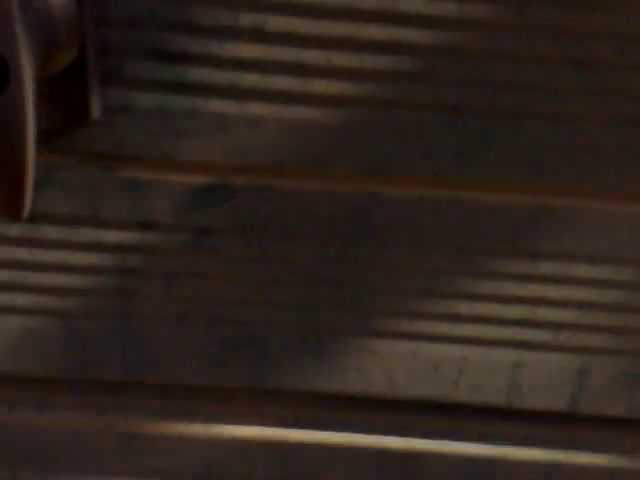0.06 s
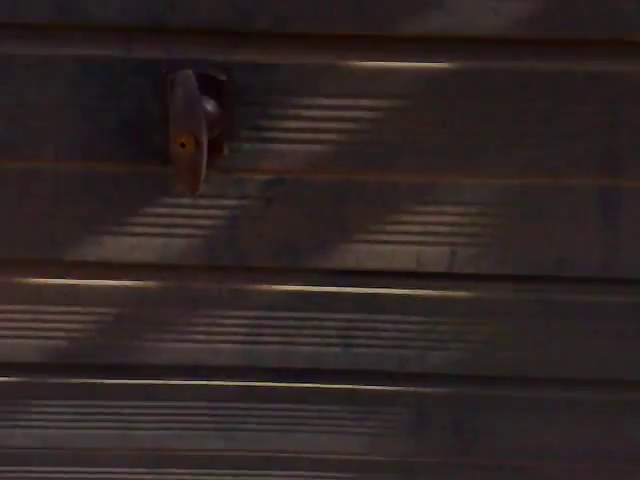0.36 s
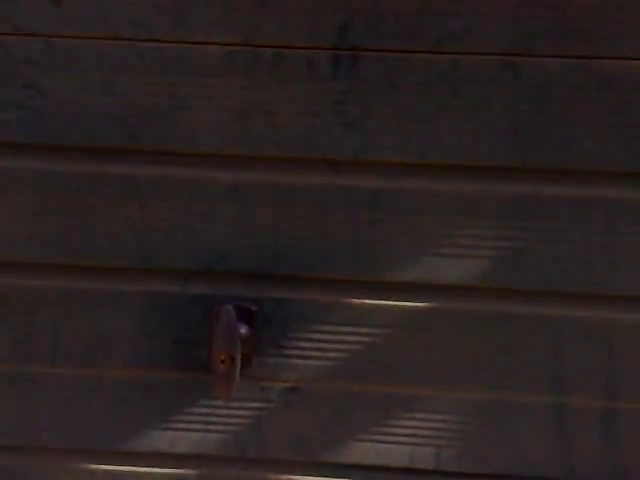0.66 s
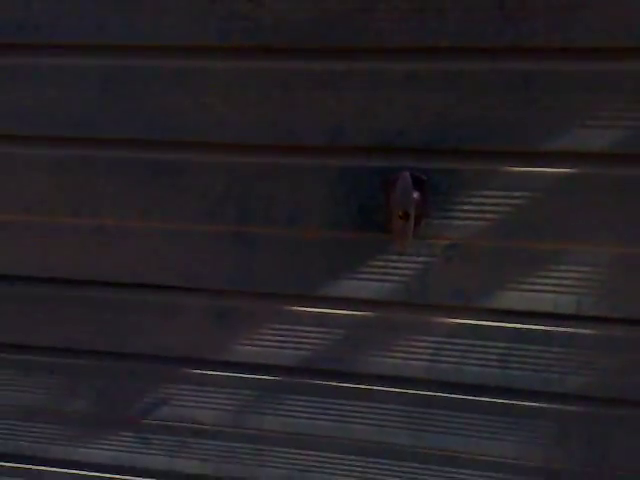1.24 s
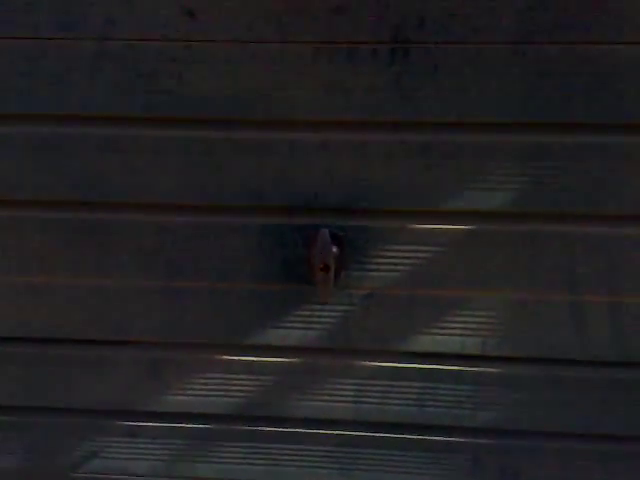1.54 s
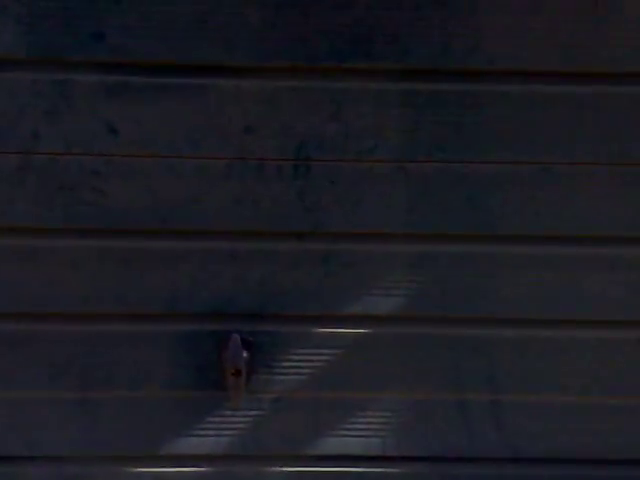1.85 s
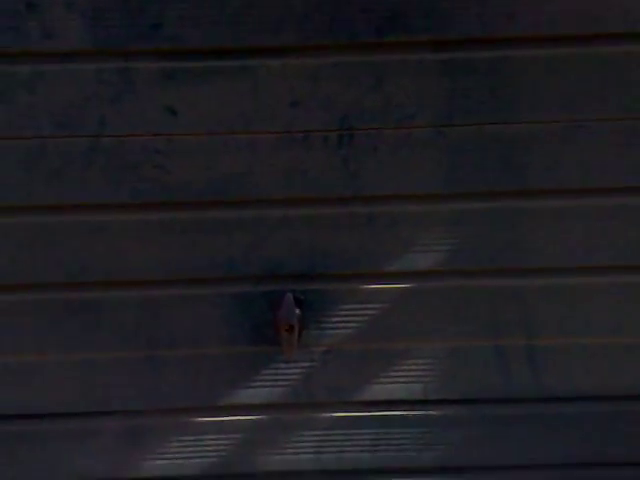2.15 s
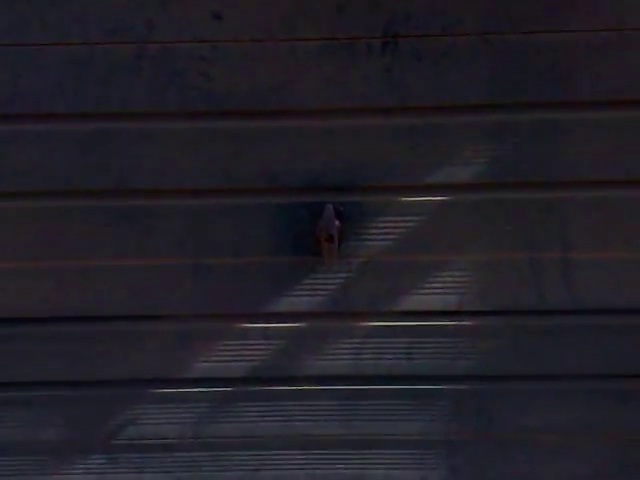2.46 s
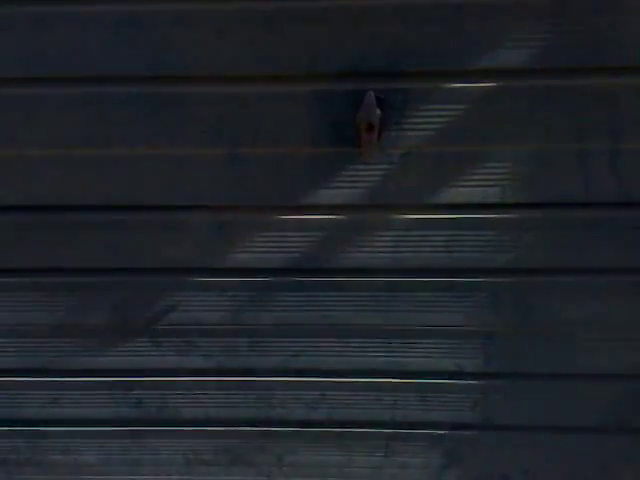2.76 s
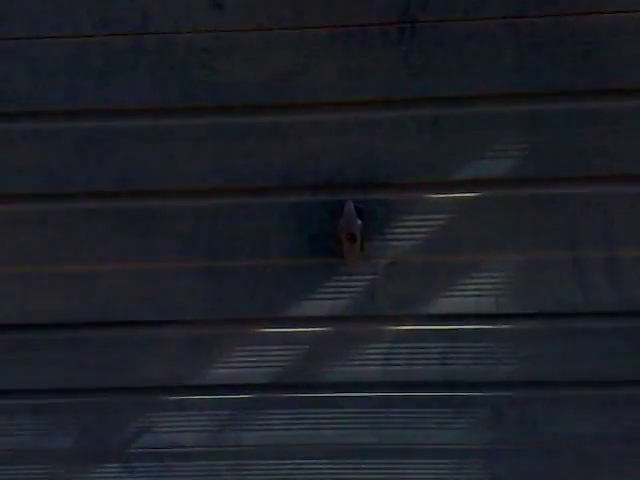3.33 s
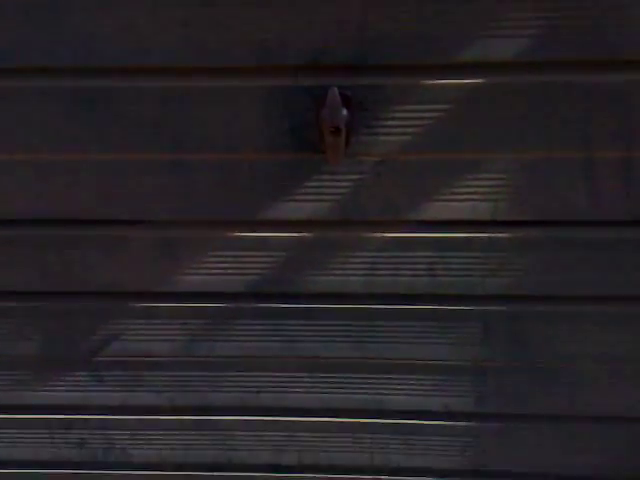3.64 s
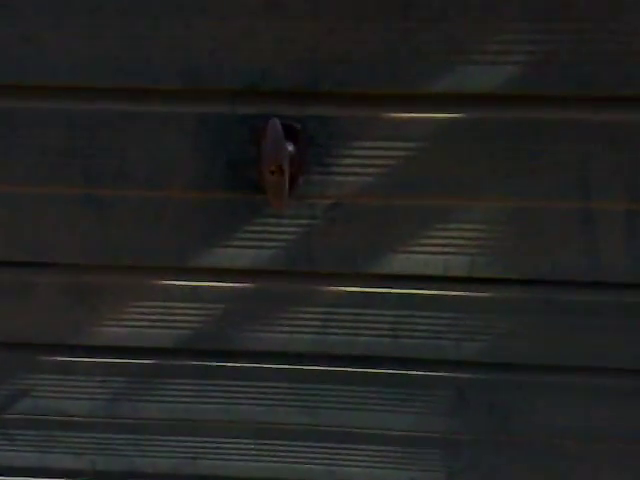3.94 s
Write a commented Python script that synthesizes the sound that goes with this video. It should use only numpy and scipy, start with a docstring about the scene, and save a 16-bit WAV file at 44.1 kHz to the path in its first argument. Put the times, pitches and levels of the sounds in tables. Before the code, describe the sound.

Loud, booming clatter of a steel garage door, settling into quiet street traffic.

```python
"""Inside a garage, microphone close to a sectional steel door. A thin high peep, then the door bangs and
overloads the input: its panels boom and ring, its hinges and rollers clatter, then tick as they settle. After
the bang the steady traffic outside is heard much lower and returns over the next two seconds, while a vehicle
passes, its engine drone sinking in pitch. Near the end come a second, fainter engine note and a few more peeps."""
import sys
import numpy as np
from scipy import signal
from scipy.fft import rfft, irfft
from scipy.io import wavfile

SR = 44100
rng = np.random.default_rng(int(sys.argv[2]) if len(sys.argv) > 2 else 0)


def waveform_to_disk(signal):
    """Save audio, clipped to [-1, 1], as 16-bit WAV at the path in sys.argv[1]."""
    frames = np.transpose(np.atleast_2d(signal))
    scaled = np.clip(frames, -1, 1) * 32767
    samples = np.round(scaled).astype(np.int16)
    wavfile.write(sys.argv[1], SR, samples)


N = 176400

# Blows of the door sections, close up. Each row: start in seconds, panel and clash level in relative dB.
DOOR_BLOWS = [(.062, 1.5, -0.5), (0.067, -7.5, 3), (0.081, 3, -5), (0.13, -3, -2), (.169, -16, -1.5),
              (0.19, -13, -11), (.240, -7.5, -11), (.262, -16, -16), (.290, -14, -13), (.335, -11, -18),
              (0.368, -19, -26), (.427, -14, -22), (.450, -28, -20), (0.475, -24.5, -19), (.488, -32, -34)]
# Decay of the panels. Each row: frequency in Hz, seconds to fall 60 dB.
PANEL_DECAY = [(60, 1.14), (250, 1.39), (700, 1.29), (1600, 0.97), (4000, 0.85), (8000, 0.44), (15000, .5)]
# Strongest panel modes. Each row: frequency in Hz, level in relative dB, seconds to fall 60 dB.
DOOR_MODES = [(78.2, 1.5, 0.47), (117.9, -8.5, 1.64), (151.9, -6.5, 0.65), (224.4, -16.5, 1.1),
              (291, -10.5, 0.47), (441.4, -12, 1.2), (1290, -11.5, 1.3), (1330, -14, 1.1), (1415, -21, 1.2),
              (1587, -11, 1), (1867, -22.5, 1.2), (2090, -12.5, .6), (2332, -11.5, 0.65), (2710, -12, .6)]
# The hardware settling. Each row: start in seconds, body and bright edge level in relative dB.
SETTLING_TICKS = [(.574, -48, -54), (.634, -43, -59), (.708, -43, -76), (.759, -53, -70), (.793, -38, -69),
                  (0.81, -50, -68), (.823, -53, -65), (.885, -47, -78), (.953, -42, -69.5),
                  (.968, -41, -54.5), (1.018, -42, -61), (1.130, -40.5, -72), (1.357, -45, -61),
                  (1.378, -42, -54), (1.429, -39, -65), (2.049, -39, -62), (3.625, -48, -58)]
# Spectra of the door's steel. Each row: frequency in Hz, density in relative dB.
PANEL_COLOUR = [(25, -7), (45, -9.5), (80, -6), (125, -5), (200, -5.5), (300, -9), (430, -12.5), (510, -17),
                (810, -11.5), (1150, -12), (1500, -9), (2200, -14), (3000, -21.5), (4900, -26), (7900, -41),
                (12000, -44), (16500, -45.5)]
CLASH_COLOUR = [(200, -18), (900, -7), (1900, 2.5), (3000, -7), (4200, 0.5), (6500, -12), (9000, -26),
                (16500, -40)]
CLASH_TOP_COLOUR = [(4000, -17), (7000, -1), (9500, 0.5), (13500, 3.5), (15500, -8), (16800, -13)]
TICK_COLOUR = [(500, -18), (1500, 5.5), (2500, 4), (4000, 3), (6000, -11.5), (9000, -34), (16000, -40)]
TICK_EDGE_COLOUR = [(3000, -12), (6500, 3), (9000, -6), (14000, -6), (16500, -7)]
# Spectra of the background: tyre roar of the passing vehicle and the traffic behind it, low rumble,
# tyre sizzle, faint hiss. Each row: frequency in Hz, density in relative dB.
VEHICLE_COLOUR = [(120, -25), (190, -1.5), (270, -2), (360, -10.5), (560, -8.5), (800, -4), (980, -4.5),
                  (1170, -10), (1560, -9), (2100, -14.5), (3000, -30.5), (4100, -31.5), (6000, -47),
                  (9000, -68)]
TRAFFIC_COLOUR = [(25, -9), (60, 2), (96, -7), (155, -3.5), (185, -11), (220, -4), (300, -4.5), (400, -9.5),
                  (610, -7), (840, -9), (960, -6.5), (1800, -10.5), (2300, -19), (2900, -31), (3700, -36.5),
                  (7000, -49.5)]
RUMBLE_COLOUR = [(25, -4), (48, -4), (85, 3), (115, 2), (170, -22.5), (400, -52)]
SIZZLE_COLOUR = [(1200, -19.5), (2200, 12), (3000, -1.5), (4500, -12.5), (6500, -29.5), (10000, -40.5)]
HISS_COLOUR = [(3000, -4), (7000, -2.5), (11000, -2.5), (16500, 2.5)]
# How loud those five layers are heard, all low after the bang. Each row: time in seconds, level in dB.
VEHICLE_LEVELS = [(0, -55), (.7, -40.5), (.92, -32), (1.1, -28.5), (1.26, -23.5), (1.6, -24), (2.0, -26.5),
                  (2.25, -28.5), (2.55, -34.5), (3.0, -36), (4, -43)]
TRAFFIC_LEVELS = [(0, -24), (.4, -43), (.85, -40.5), (1.5, -29.5), (2.1, -27.5), (2.5, -26.5), (3.1, -29),
                  (3.6, -29), (4, -26.5)]
RUMBLE_LEVELS = [(0, -23.5), (.8, -42.5), (1.3, -38.5), (1.85, -50), (1.96, -28.5), (2.1, -33), (2.25, -27),
                 (2.38, -39.5), (3.1, -53), (3.75, -42), (4, -47)]
SIZZLE_LEVELS = [(0, -41), (.8, -50.5), (1.8, -55), (2.2, -37), (2.5, -39.5), (2.85, -53), (3.4, -47.5),
                 (3.75, -44.5), (4, -46)]
HISS_LEVELS = [(0, -51), (.1, -73), (.7, -87), (.92, -83), (1.2, -70.5), (1.7, -67), (2.3, -63), (4, -60.5)]
# Two engine notes out on the street. Each row: time in seconds, pitch in Hz, level in relative dB.
PASSING_ENGINE = [(.6, 275, -38.5), (1.0, 275, -35), (1.35, 250, -37), (1.55, 234.8, -27), (1.7, 228, -28),
                  (2.05, 225, -32), (2.2, 205, -26), (2.42, 220, -41.5), (4, 215, -47)]
FAINTER_ENGINE = [(2.9, 152, -71), (3.1, 155, -43), (3.33, 158.1, -41), (3.45, 155.6, -28.5),
                  (3.56, 160.7, -29.5), (3.68, 153.4, -52)]
# Thin peeps. Each row: start in seconds, length in seconds, pitch in Hz, level in dB.
PEEP_NOTES = [(.008, 0.075, 4420, -45.5), (3.569, 0.046, 2300, -41), (3.628, .06, 3120, -61),
              (3.718, .07, 3310, -57), (3.84, 0.058, 3010, -57), (3.936, .066, 4450, -45)]

FIRST_BLOW_S, PANEL_RISE_S = DOOR_BLOWS[0][0], 0.0034


def panels(bands=12, gain_db=-8, rise_cycles=1.5):
    """Every blow feeds the steel's crowded modes; the bass builds slowly and the treble dies first."""
    times, panel_db, _ = np.array(DOOR_BLOWS).T
    sheet = rfft(noise(PANEL_COLOUR))
    centres = np.geomspace(40, 15000, bands)
    out = 0
    for hz, share in zip(centres, np.eye(bands)):
        band = irfft(sheet * np.interp(np.log(bins()), np.log(centres), share), N)
        decay = fade(clock(), t60=at_pitch(PANEL_DECAY, hz), rise=PANEL_RISE_S + rise_cycles / hz)
        out += band * envelope(times, undb(panel_db), decay)
    return undb(gain_db) * out


def boom(gain_db=-4, rise_cycles=0.86):
    """The first blow sets the strongest modes of the door ringing."""
    age = clock() - FIRST_BLOW_S
    out = 0
    for hz, db, t60 in DOOR_MODES:
        mode = np.sin(2 * np.pi * hz * age + .5 * walk(13))
        out += undb(db) * fade(age, t60, rise=PANEL_RISE_S + rise_cycles / hz) * mode
    return undb(gain_db) * out


def hardware(rattles=62, rattle_end_s=.37, fall_db_per_s=32.5, spread_db=6.5):
    """Hinges and rollers clash at each blow and rattle in between, ever weaker and duller."""
    blow_s, _, clash_db = np.array(DOOR_BLOWS).T
    place, size = rng.random((rattles, 2)).T
    delay_s = place * (rattle_end_s - FIRST_BLOW_S)
    rattle_db = -9.5 - fall_db_per_s * delay_s + spread_db * (2 * size - 1)
    times = np.r_[blow_s, FIRST_BLOW_S + delay_s]
    force = undb(np.r_[clash_db, rattle_db])
    crack = undb(7) * fade(clock(), t60=0.014, rise=0.00065)
    shape = crack + fade(clock(), t60=0.18, rise=0.0023)
    body = steel(CLASH_COLOUR) * envelope(times, force, shape)
    top = steel(CLASH_TOP_COLOUR) * envelope(times, force ** 1.26, shape)  # harder contacts are brighter
    return undb(-11.5) * body + undb(-20.5) * top


def ticks():
    """Small dry knocks as the door settles, each with a short tail in the garage."""
    body, edge = steel(TICK_COLOUR), steel(TICK_EDGE_COLOUR)
    out = 0
    for start, body_db, edge_db in SETTLING_TICKS:
        age = clock() - start
        snap = undb(4) * fade(age, t60=0.022, rise=.0005)
        tail = undb(-2.5) * fade(age, t60=0.25, rise=.002)
        out += (snap + tail) * (undb(body_db) * body + undb(edge_db) * edge)
    return out


def steel(colour):
    """The dense ring of small steel parts."""
    return resonant(noise(colour), depth_db=1.5, spacing_hz=70.05)


def street(drift_db=.5, flicker_db=0.47):
    """The street sound is heard low after the bang and returns over the next two seconds, while a vehicle
    passes."""
    layers = [(VEHICLE_COLOUR, VEHICLE_LEVELS), (TRAFFIC_COLOUR, TRAFFIC_LEVELS),
              (RUMBLE_COLOUR, RUMBLE_LEVELS), (SIZZLE_COLOUR, SIZZLE_LEVELS)]
    drift = drift_db * walk(1.8)
    return sum(noise(colour) * undb(curve(levels) + drift + flicker_db * walk(22))
               for colour, levels in layers)


def garage(x, hollow_hz=987, width_hz=73, hollow_db=1.5):
    """Crowded room resonances, one of them broad, make the street sound hollow at the microphone."""
    hollow = undb(hollow_db / (1 + (2 * (bins() - hollow_hz) / width_hz) ** 2))
    return resonant(irfft(rfft(x) * hollow, N), depth_db=2, spacing_hz=14)


def engine(track, steady=0.49, rough=0.67, roughness_hz=37):
    """An engine note outside glides slowly, its strength and pitch unsteady."""
    phase = 2 * np.pi * np.cumsum(curve(track)) / SR + 0.5 * walk(5.6)
    in_phase = (np.sqrt(2) * steady + rough * walk(roughness_hz)) * np.sin(phase)
    quadrature = rough * walk(roughness_hz) * np.cos(phase)
    return (in_phase + quadrature) * undb(curve(track, column=2))


def hoot(peak_s=1.437, half_width_s=.017, hz=239.4, db=-15):
    """A soft, low note inside the drone swells and is gone within a few cycles."""
    age = clock() - peak_s
    return undb(db) * np.exp(-(age / half_width_s) ** 2) * np.sin(2 * np.pi * hz * age)


def peeps(sag_hz_per_s=600, waver_hz=14.2, scatter_hz=349, settle_s=0.0074, edge_s=0.0067):
    """Short high notes that start rough, turn pure and sag a little."""
    out = 0
    for start, length, hz, db in PEEP_NOTES:
        age = clock() - start
        sag = sag_hz_per_s * (np.clip(age, 0, length) - length / 2)
        waver = waver_hz * walk(110)
        rough_onset = scatter_hz * np.exp(-np.maximum(age, 0) / settle_s) * walk(399)
        phase = 2 * np.pi * np.cumsum(hz - sag + waver + rough_onset) / SR
        gate = np.clip(np.minimum(age, length - age) / edge_s, 0, 1)
        out += undb(db) * gate * np.sqrt(2) * np.sin(phase)
    return out


def hiss():
    """A faint hiss behind everything dips after the bang and returns."""
    return noise(HISS_COLOUR) * undb(curve(HISS_LEVELS))


def undb(db):
    """Decibels to gain."""
    return 10 ** (np.asarray(db) / 20)


def clock():
    """Time of every sample in seconds."""
    return np.arange(N) / SR


def bins():
    """Frequencies of the spectrum's bins in Hz."""
    return np.maximum(np.arange(N // 2 + 1) * SR / N, 1)


def curve(rows, column=1):
    """One column of a table, joined by straight lines in time."""
    rows = np.array(rows)
    return np.interp(clock(), rows[:, 0], rows[:, column])


def at_pitch(rows, hz):
    """A table read on a log-frequency axis."""
    rows = np.array(rows)
    return np.interp(np.log(hz), np.log(rows[:, 0]), rows[:, 1])


def noise(colour):
    """Unit noise of a given colour, falling away beyond its ends."""
    hz = bins()
    low_hz, high_hz = .8 * colour[0][0], 1.2 * colour[-1][0]
    roll_off = 1 / np.sqrt((1 + (low_hz / hz) ** 6) * (1 + (hz / high_hz) ** 10))
    x = irfft(rfft(rng.standard_normal(N)) * undb(at_pitch(colour, hz)) * roll_off, N)
    return x / x.std()


def walk(rate_hz):
    """Smooth random wander with a spread of 1."""
    x = irfft(rfft(rng.standard_normal(N)) * np.exp(-(bins() / rate_hz) ** 2), N)
    return x / x.std()


def fade(age, t60, rise):
    """Quick rise and exponential decay after age 0; all times in seconds."""
    age = np.maximum(age, 0)
    return (1 - np.exp(-age / rise)) * np.exp(-np.log(1000) * age / t60)


def envelope(times, sizes, shape):
    """Amplitude of overlapping hits of one shape, whose energies add."""
    energy = np.bincount((times * SR).astype(int), sizes ** 2, N)
    return np.sqrt(np.abs(signal.fftconvolve(energy, shape ** 2)[:N]))


def resonant(x, depth_db, spacing_hz):
    """Irregular, crowded resonances colour a sound at about the same power."""
    heights = np.sqrt(3) * rng.uniform(-1, 1, size=4096)
    gain = undb(depth_db * np.interp(bins() / spacing_hz, np.arange(4096), heights))
    return irfft(rfft(x) * gain / np.sqrt(np.mean(gain ** 2)), N)


def scene():
    """One microphone in the garage: the door close by, the street beyond it."""
    door = panels() + boom() + hardware() + ticks()
    background = garage(street()) + hiss()
    engines = engine(PASSING_ENGINE) + engine(FAINTER_ENGINE)
    return (door + background + engines + hoot() + peeps())[None]


def record(dry, input_db=-1.5, knee=6.8, top_hz=17000):
    """This close to the door, the microphone input overloads on the bang; the top is cut."""
    x = dry * undb(input_db)
    clipped = x / (1 + np.abs(x) ** knee) ** (1 / knee)
    low_pass = signal.ellip(10, .1, 70, top_hz, fs=SR, output="sos")
    return signal.sosfilt(low_pass, clipped)


dry = scene()
out = record(dry)
waveform_to_disk(out)
```